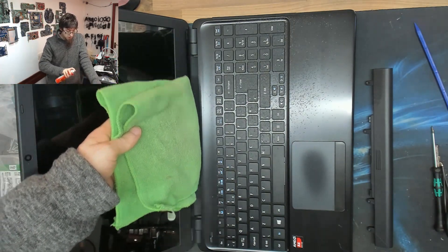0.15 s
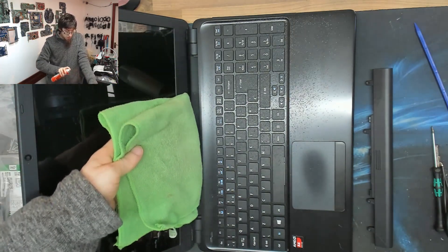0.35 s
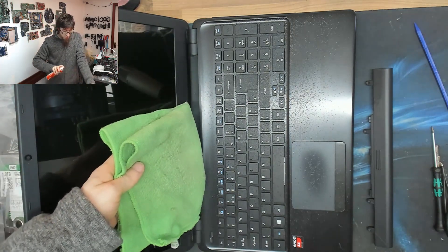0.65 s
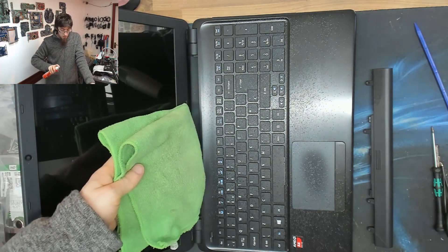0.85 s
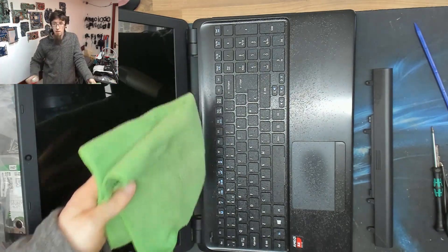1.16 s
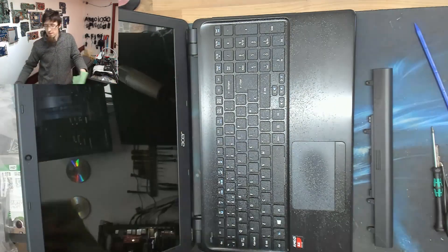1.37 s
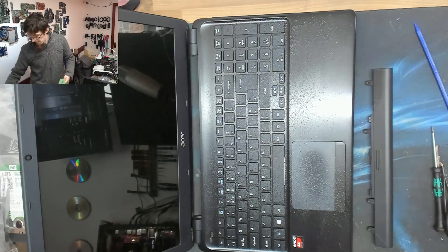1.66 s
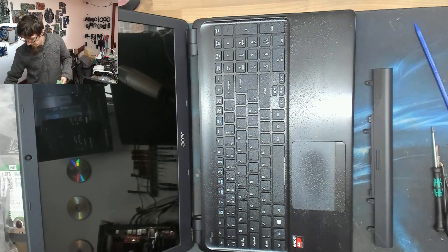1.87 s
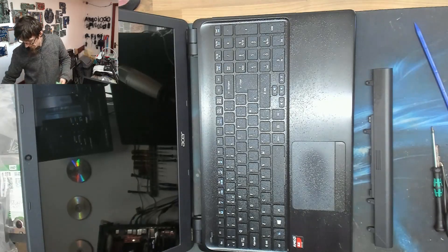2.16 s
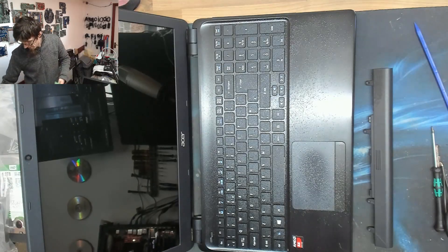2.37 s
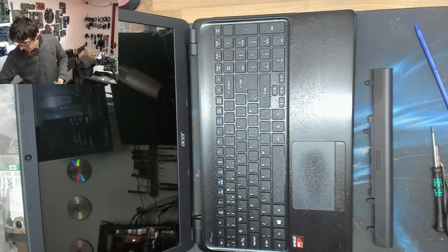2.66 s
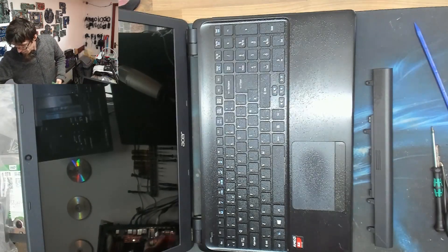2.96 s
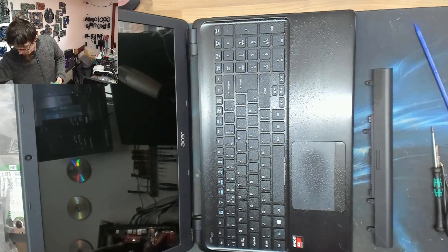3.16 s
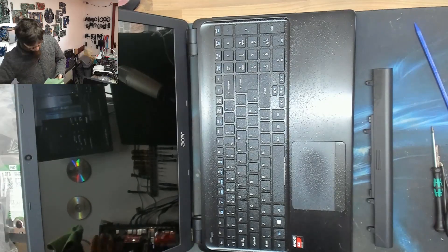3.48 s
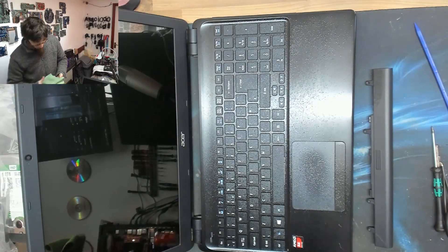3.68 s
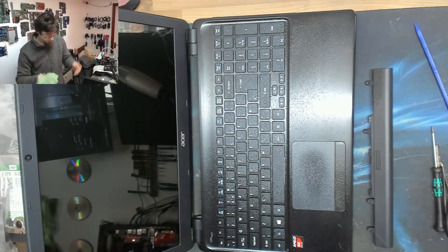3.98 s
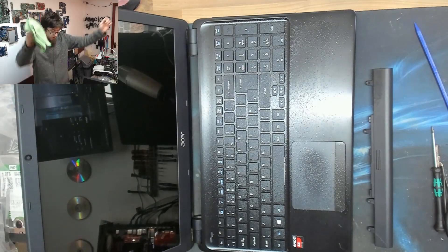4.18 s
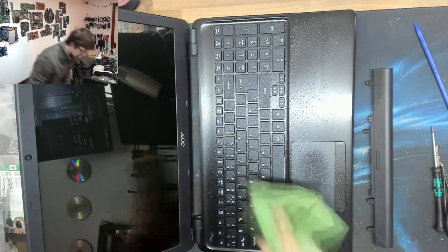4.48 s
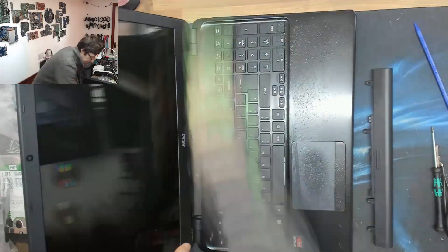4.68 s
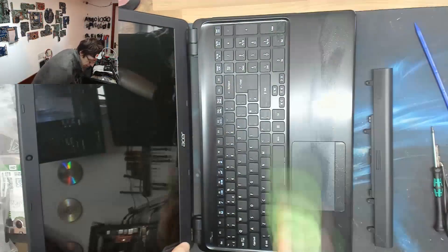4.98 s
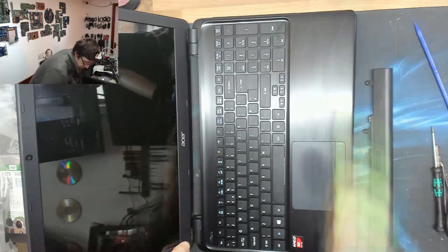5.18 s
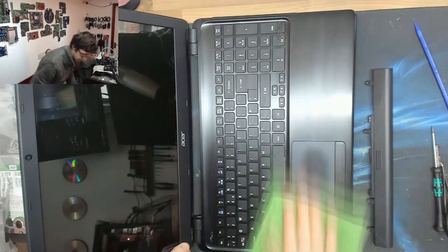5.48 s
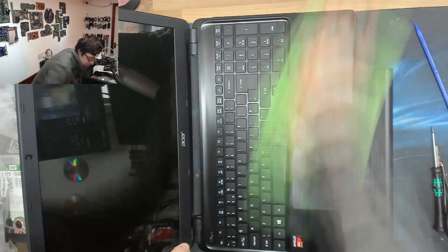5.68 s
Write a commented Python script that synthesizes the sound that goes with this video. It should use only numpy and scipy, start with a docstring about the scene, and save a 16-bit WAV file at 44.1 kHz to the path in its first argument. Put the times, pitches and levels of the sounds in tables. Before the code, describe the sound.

Close up in a small dry room, an aerosol hisses in about ten quick sputtering puffs. The can taps down with small metallic tinks, things slide on the desk and a plastic cap snaps sharply. After a quiet gap, a heavy object slams onto the desk, rattles and rocks to rest. A cloth swishes, then wipes plastic and keys with squeaks and low bumps.

```python
"""A small can hisses in short puffs: sputtering noise shaped by a nozzle. It is set down with tinks (short sines)
while things slide on the desk (rubbing noise), then capped with a snap (noise bands that die away).
Something heavy lands on the desk (noise, a low push and ringing tones), rattles, chinks and rocks to rest.
A cloth swishes, wipes a plastic case and its keys with squeaks and a low hum, then scrubs amid low bumps: grainy
noise and gliding tones. Low desk rumble and faint noise run throughout, in a small dry room."""
import sys
import numpy as np
from scipy import signal
from scipy.fft import rfft, irfft
from scipy.io import wavfile

SR = 44100
rng = np.random.default_rng(int(sys.argv[2]) if len(sys.argv) > 2 else 0)


def transcribe(u):
    """Save the signal u as a 16-bit wav file named by the first command-line argument.

    u: samples, shape (n,) or (channels, n), limited to [-1, 1]; the rate is SR.
    q: integer samples, one column per channel.
    """
    v = np.clip(np.atleast_2d(u).T, -1, 1)
    q = np.round(v * 32767).astype(np.int16)
    wavfile.write(sys.argv[1], SR, q)


N = 257544
TIME = np.arange(N) / SR

# blows on the desk: (time [s], level [dB])
THUDS = [(1.062, -65), (1.104, -53), (3.075, -2), (3.315, -47.5), (3.409, -49.5), (3.483, -20.5),
         (3.552, -46), (3.616, -20.5), (3.678, -33.5), (3.736, -28.5), (3.884, -41.5), (3.925, -32.5),
         (3.998, -32), (4.033, -34.5), (4.425, -40.5)]
# how strongly the desk sounds at each pitch: (frequency [Hz], relative level [dB])
DESK_COLOUR = [(60, -8), (135, -5), (302, -1), (1030, -14), (1800, -17.5), (3500, -30.5), (15000, -58.5)]
# something rolls and rocks to rest: (time [s], level [dB])
ROLLING = [(3.28, -63.5), (3.46, -54), (3.56, -43.5), (4.05, -47.5), (4.15, -56), (4.36, -120)]
# the cloth crosses rows of keys:
# (first catch [s], time between catches [s], rub above steady contact [dB], rustle above steady contact [dB])
KEY_RUNS = [(4.632, 0.0445, 12.1, 8), (5.152, 0.049, 3.6, -2)]
KEY_ROWS = 9, 3   # number of catches in each run


def from_db(db):
    """Turn decibels into a gain."""
    return 10 ** (np.asarray(db) / 20)


def rms_one(x):
    """Scale a sound so its average (rms) strength is 1."""
    return x / np.sqrt(np.mean(x ** 2) + 1e-20)


def at_hz(points, hz):
    """Read a table between its points, along a log frequency axis."""
    p = np.array(points)
    return np.interp(np.log(hz + 1e-9), np.log(p[:, 0]), p[:, 1])


def in_time(rows):
    """Draw each column of a table as a curve over time, one value a sample."""
    s, *columns = np.transpose(rows)
    return [np.interp(TIME, s, c) for c in columns]


def level_between(s, db):
    """Draw a level curve in dB that is practically silent before its first and after its last point."""
    return np.interp(TIME, s, db, left=-140, right=-140)


def drift(rate):
    """Wander slowly at random around 0 with rms 1; a higher rate (Hz) wanders faster."""
    r = np.exp(-2 * np.pi * rate / SR)
    wander = signal.lfilter([1], [1, -2 * r, r * r], rng.standard_normal(N + SR))
    return rms_one(wander[SR:])   # skip the filter's start-up


def coloured(spectrum, x):
    """Weight a sound's frequencies by a table, with nothing below the table's low end; rms 1."""
    hz = np.fft.rfftfreq(N, 1 / SR)
    inside = hz >= spectrum[0][0]
    return rms_one(irfft(rfft(x) * from_db(at_hz(spectrum, hz)) * inside, N))


def low_pass(x, hz):
    """Remove what lies above a frequency, with a fourth-order slope."""
    return signal.sosfilt(signal.butter(4, hz, fs=SR, output="sos"), x)


def grit(per_s, spread_db):
    """Make a bed of noise with dense random clicks of uneven size, like a rough surface."""
    sizes = from_db(spread_db * np.minimum(rng.exponential(1, N), 5))
    hits = rng.random(N) < per_s / SR
    return rng.standard_normal(N) * (1 + sizes * hits)


def clicks(rows, gain_db):
    """Put one click at each row's time."""
    train = np.full(N, 1e-18)   # not quite zero, to keep the filters quick
    np.add.at(train, np.round(np.array(rows)[:, 0] * SR).astype(int), from_db(gain_db))
    return train


def die_away(x, t60):
    """Turn each click into a level that falls by 60 dB in t60 seconds."""
    return signal.lfilter([1], [1, -from_db(-60 / (t60 * SR))], x)


def resonate(x, hz, t60):
    """Let each unit click set a dying sine of starting height 1 ringing."""
    r, w = from_db(-60 / (t60 * SR)), 2 * np.pi * hz / SR
    return signal.lfilter([0, np.sin(w)], [1, -2 * r * np.cos(w), r * r], x)


def ring(rows, modes, scatter_db, level_db, contact_s):
    """Strike each mode with its own random strength; a padded contact lets the ring build up."""
    out = np.zeros(N)
    luck = rng.normal(0, 1, (len(rows), len(modes)))
    for k, (hz, db, t60) in enumerate(modes):
        gain_db = np.array(rows)[:, 1] + db + level_db + scatter_db * luck[:, k]
        ringing = resonate(clicks(rows, gain_db), hz, t60)
        out += resonate(ringing, hz, contact_s) * 2 * np.log(1000) / (contact_s * SR)
    return low_pass(out, 1.5 * modes[-1][0])   # little above the top mode


def soft(rows, hz):
    """Loss in dB above a blow's contact edge: a soft contact lasts longer, so it sounds duller."""
    edge_hz = np.array(rows)[:, 2]
    return -10 * np.log10(1 + (hz / edge_hz) ** 12)


def clatter(rows, spectrum, decay, crack_db, level_db, contact_s):
    """Stand in for too many modes to count: noise bands, each a short crack and a tail with its own decay."""
    out = np.zeros(N)
    edges = np.geomspace(60, 16000, 21)
    white = rng.standard_normal((2, N))   # neighbouring bands use different noise
    for k, (low, high) in enumerate(zip(edges, edges[1:])):
        hz = np.sqrt(low * high)
        gain_db = np.array(rows)[:, 1] + level_db + at_hz(spectrum, hz) + soft(rows, hz)
        train = clicks(rows, gain_db)
        tail = die_away(train, at_hz(decay, hz))
        crack = from_db(crack_db) * die_away(train, 0.015)
        # the contact time rounds off the start
        step = 1 / (contact_s * SR)
        swell = signal.lfilter([step], [1, step - 1], tail + crack)
        band = signal.butter(4, [low, high], "band", fs=SR, output="sos")
        out += signal.sosfilt(band, white[k % 2] * swell)
    return out


def floor():
    """Faint steady noise, weaker toward the treble."""
    # background colour: (frequency [Hz], relative level [dB])
    floor_colour = [(150, -4), (1780, -18.5), (15800, -33)]
    return coloured(floor_colour, rng.standard_normal(N)) * from_db(-88)


def rumble():
    """The desk shakes a little at rest, more after blows, under the rolling and under the leaning hand."""
    # resting shake of the desk: (time [s], level [dB])
    rest_shake = [(0, -67), (1.05, -64), (2.6, -63), (2.75, -95), (3.06, -57.5)]
    # colour of the shake: (frequency [Hz], relative level [dB])
    shake_colour = [(12, 8), (43, -2), (81, 2.5), (172, -19.5), (500, -81)]
    after_db, after_t60_s = -42.5, 0.69   # each blow's after-shake, relative to the blow; its decay
    roll_share, roll_db = 0.44, -18   # share of the rolling's dB that the shake follows, and its offset
    lean_s, lean_rise_s, lean_db = 4.485, 0.17, -41   # the wiping hand leans on the desk

    after = die_away(clicks(THUDS, np.array(THUDS)[:, 1] + after_db), after_t60_s)
    rolling = from_db(roll_share * level_between(*np.transpose(ROLLING)) + roll_db)
    lean = from_db(lean_db) * np.clip((TIME - lean_s) / lean_rise_s, 0, 1) ** 2
    rest = from_db(in_time(rest_shake)[0])
    level = np.sqrt(rest ** 2 + after ** 2 + rolling ** 2 + lean ** 2)
    return coloured(shake_colour, rng.standard_normal(N)) * level * from_db(3.5 * drift(35))


def moan():
    """A soft low hum slides up under the wipe, broken and unsteady in level."""
    # path of the hum: (time [s], pitch [Hz], level [dB])
    glide = [(5.04, 125.5, -44.5), (5.24, 205, -55), (5.3, 220, -59)]
    s, hz, db = np.transpose(glide)
    phase = 2 * np.pi * np.cumsum(np.interp(TIME, s, hz)) / SR
    return np.sin(phase) * from_db(level_between(s, db) + 6 * drift(22))


def chinks():
    """A small loose part chinks as the heavy thing rocks, and once more shortly after: short scuffed rings."""
    # chinks of the loose part: (time [s], level [dB], pitch [Hz])
    loose_part = [(3.49, -71, 4140), (3.517, -70, 3600), (3.628, -68, 3630), (3.736, -68, 3220),
                  (3.738, -78, 4040), (3.968, -82, 3060), (3.995, -77.5, 3620), (4.012, -71, 4330),
                  (4.036, -77, 5030), (4.492, -74.5, 3710)]
    out, scuff = np.zeros(N), 1 + drift(70)
    for s, db, hz in loose_part:
        age = np.maximum(TIME - s, 0)
        fade = from_db(db - 60 * age / 0.13)
        out += fade * np.sin(2 * np.pi * hz * age) * np.minimum(age / 0.0094, 1)   # soft start
    return out * scuff


def rattles():
    """The keys rattle under a hard scrub: bright noise bursts that die quickly."""
    # bursts: (time [s], level [dB])
    bursts = [(5.449, -71), (5.71, -40), (5.796, -38)]
    # colour of the rattling keys: (frequency [Hz], relative level [dB])
    key_colour = [(4500, -5), (7000, 9.5), (10500, -5)]
    fade = die_away(clicks(bursts, np.array(bursts)[:, 1]), 0.1)
    return coloured(key_colour, rng.standard_normal(N)) * fade


def can():
    """Each tap rings the can wall with one clear short tone and wakes clusters of small rings."""
    # taps on the can: (time [s], clear ring [dB], small rings [dB],
    #                   centre of the small rings it wakes [Hz], spread of those it wakes [log frequency])
    taps = [(1.086, -56.5, -66.5, 6000, 0.36), (1.106, -45, -65.5, 8000, 1), (1.204, -48, -72, 9000, 1),
            (1.387, -68, -84, 5800, 0.24), (3.303, -56, -64.5, 11300, 0.28),
            (3.491, -81, -63.5, 9040, 0.098)]
    # centres of the small-ring clusters: (frequency [Hz])
    cluster_hz = [4110, 4650, 5720, 6340, 7730, 8600, 9400, 10500, 12100, 13500, 14400]
    wall_hz, wall_t60_s, small_t60_s = 2614, 0.06, 0.14

    out = np.zeros(N)
    waver = 1 + .9 * drift(130)   # random wavering roughens the clear ring
    hz = np.repeat(cluster_hz, 7)[:, None]   # seven close rings in each cluster
    hz = hz * (1 + .05 * rng.standard_normal(hz.shape))
    all_draws = rng.normal(0, 1, (len(taps), len(hz), 2))
    for (s, db, small_db, centre_hz, width), draws in zip(taps, all_draws):
        part = slice(int(s * SR), int((s + .3) * SR))
        age = TIME[part] - TIME[part][0]
        late = np.maximum(age - 0.002 * np.abs(draws[:, 1:]), 0)   # the touch rattles for a few ms
        woken = np.exp(-.5 * (np.log(hz / centre_hz) / width) ** 2)
        fade = from_db(2.9 * draws[:, :1] - 9.5 - 60 * late / small_t60_s)
        small = (woken * fade * np.sin(2 * np.pi * hz * late)).sum(0)
        wall = np.sin(2 * np.pi * wall_hz * age) * from_db(-60 * age / wall_t60_s)
        wall *= np.minimum(age / 0.007, 1) * waver[part]
        out[part] += (from_db(db) * wall + from_db(small_db) * small) * np.minimum(age / 0.0028, 1)
    return out


def drag():
    """Things slide on the desk: friction noise sounds in the hollow parts it shakes."""
    # sliding: (time [s], level [dB])
    slide = [(1.0, -58.5), (1.63, -84), (1.69, -49), (1.9, -47), (2.45, -60.5), (2.62, -77.5)]
    # hollow parts: (frequency [Hz], width [Hz], relative level [dB])
    hollows = [(378, 160, 0.5), (581, 470, -7), (910, 190, -11.5), (1371, 210, 5)]
    out, rub = np.zeros(N), grit(260, spread_db=-1.5)
    for hz, width, top_db in hollows:
        r = np.exp(-np.pi * width / SR)
        poles = [1, -2 * r * np.cos(2 * np.pi * hz / SR), r * r]
        once = signal.lfilter([1, 0, -1], poles, rub)
        band = signal.lfilter([1, 0, -1], poles, once)   # twice, for a steeper resonance
        out += rms_one(band) * from_db(top_db - 13.5 + 3.5 * drift(22))
    level = from_db(in_time(slide)[0] + 4.1 * drift(17))
    return low_pass(out, 850) * level * (TIME < slide[-1][0])


def roll():
    """Something rolls and rocks: a dense rattle of small knocks, dull noise in the desk's colour."""
    small_knocks = grit(60, spread_db=5.0) * from_db(2.2 * drift(18))
    level = from_db(level_between(*np.transpose(ROLLING)))
    return low_pass(coloured(DESK_COLOUR, small_knocks), 710) * level


def nozzle():
    """Each puff opens fast, holds and dies as pressure drops; the jet of air hisses and sputters."""
    # puffs: (time [s], level [dB], time held [s])
    puffs = [(0.0, -18.5, 0.051), (0.183, -22.5, 0.048), (0.216, -20, 0.068), (0.2504, -28, 0.032),
             (0.3772, -21.5, 0.036), (0.44, -22.5, 0.044), (0.561, -23, 0.033), (0.6336, -22.5, 0.031),
             (0.741, -24, 0.042), (0.826, -23, 0.033)]
    # colour of the hiss: (frequency [Hz], relative level [dB])
    jet_colour = [(400, -23), (900, -16.5), (1820, 1.5), (2700, -4), (5720, 2), (15600, -1)]
    echo_s, echo_share = .000765, .42

    power = np.zeros(N)
    for s, db, held in puffs:
        age = TIME - s
        fall_db = 60 * np.clip(age - held, 0, 1) / .1
        power += from_db(2 * (db - 14 - fall_db)) * np.clip(age / .009, 0, 1) ** 2
    hiss = coloured(jet_colour, grit(900, spread_db=3.2))
    jet = hiss * np.sqrt(power) * from_db(2.5 * drift(120))
    # an inverted close echo strengthens some pitches and weakens others
    return jet - echo_share * np.interp(TIME - echo_s, TIME, jet)


def squeaks():
    """The damp cloth sticks and slips on each key row of the first run: short climbing tones, new every row."""
    lowest_hz, highest_hz = 580, 950   # range of starting pitches
    rise = .25   # share the pitch climbs over one row
    (first, step, *_), last = KEY_RUNS[0], KEY_ROWS[0]
    rows = (TIME - first) / step + .5   # whole part: which row; remainder: how far across it
    row = np.clip(rows, 0, last).astype(int)
    start_hz = rng.uniform(lowest_hz, highest_hz, (last + 1, 3))[row].T   # three tones a row
    phase = 2 * np.pi * np.cumsum(start_hz * (1 + rise * (rows % 1)), axis=1) / SR
    swell = np.abs(np.sin(np.pi * rows)) * (rows > 0) * (rows < last)
    return np.sin(phase).sum(0) * swell * from_db(-2)


def contact():
    """Gains of rub and rustle: an air swish, then steady contact that swells on each key row, and scrubs."""
    # steady contact: (time [s], rub on the case [dB], fibre rustle [dB])
    touch = [(4.44, -80, -75.5), (4.558, -75.5, -99), (4.597, -55, -54), (5.0, -55.5, -53),
             (5.03, -66, -59), (5.055, -52, -48.5), (5.11, -62.5, -51), (5.27, -62, -64), (5.4, -68, -75),
             (5.53, -61.5, -62.5), (5.6, -83, -71), (5.84, -48, -52)]
    # short scrubs: (time of peak [s], rub [dB], rustle [dB], rise [s])
    scrubs = [(5.575, -47, -50.5, 0.017), (5.651, -50.5, -52, 0.017), (5.716, -43, -52.5, 0.0024),
              (5.789, -41.5, -47, 0.0026), (5.83, -53, -53, 0.0081)]
    swish_start_s, swish_stop_s, growth_db_per_s = 4.13, 4.315, 75
    swish_db = [[-61.5], [-59]]   # rub and rustle at the stop
    catch_s, catch_scatter_db, scrub_fall_s = 0.011, 2, 0.015

    swish = from_db(growth_db_per_s * np.minimum(TIME - swish_stop_s, 0))
    swish *= np.clip((TIME - swish_start_s) / 0.075, 0, 1) ** 2
    swish *= np.clip(1 + (swish_stop_s - TIME) / 0.017, 0, 1)
    steady = from_db(in_time(touch)) * (TIME > touch[0][0])
    out = steady + from_db(swish_db) * swish
    for (first, step, *lift_db), count in zip(KEY_RUNS, KEY_ROWS):
        for k, luck in enumerate(rng.normal(0, 1, (count, 2))):
            swell = np.exp(-.5 * ((TIME - first - k * step) / catch_s) ** 2)
            lift = from_db(np.array(lift_db) + catch_scatter_db * luck)
            out += steady * lift[:, None] * swell
    for s, rub_db, rustle_db, rise in scrubs:
        width = np.where(TIME < s, rise, scrub_fall_s)
        swell = np.exp(-.5 * ((TIME - s) / width) ** 2)
        out += from_db([[rub_db], [rustle_db]]) * swell
    return out


def cloth():
    """Cloth rubs and squeaks on plastic while its fibres rustle; a light touch rustles duller than a firm one."""
    # colour of the rub on the case: (frequency [Hz], relative level [dB])
    rub_colour = [(300, -5), (560, 3.5), (850, 0.5), (1250, -2.5), (2500, -21), (4500, -72.5)]
    # colour of the fibres: (frequency [Hz], relative level [dB])
    fibre_colour = [(710, -29), (1200, -6), (4570, -9.5), (8180, -15), (15800, -30.5)]
    rub, rustle = contact()
    fibres = coloured(fibre_colour, grit(1800, spread_db=4.5))
    dull = low_pass(fibres, 3900)
    half = low_pass(low_pass(fibres, 9300), 9300)
    # stronger contact opens the middle treble, then the top
    light = np.minimum(rustle / from_db(-55), 1) ** 1.2
    firm = np.minimum(rustle / from_db(-50), 1) ** 2.5
    rustling = dull + light * (half - dull) + firm * (fibres - half)
    scrub = coloured(rub_colour, grit(330, spread_db=4.0)) + squeaks()
    flutter = from_db(1.8 * drift(70))
    return flutter * (scrub * rub + rustling * rustle)


def bumps():
    """Low bumps ring two desk modes: one just after the heavy landing, the rest under the wiping hand."""
    # bumps: (time [s], level [dB])
    desk_bumps = [(3.145, -22), (5.065, -33), (5.155, -26.5), (5.25, -33), (5.495, -24.5), (5.66, -24.5),
                  (5.785, -17)]
    # low modes of the desk: (frequency [Hz], relative level [dB], time to fall 60 dB [s])
    low_modes = [(49.7, -1, 0.055), (80.5, -1, 0.099)]
    return ring(desk_bumps, low_modes, scatter_db=2.0, level_db=-1.5, contact_s=0.054)


def cap():
    """Plastic snaps and taps: noise bands with a brief crack and a dying tail."""
    # snaps and taps: (time [s], level [dB], contact edge [Hz])
    snaps = [(0.118, -41, 3374), (1.275, -51, 1870), (1.908, -11, 15000), (2.054, -29, 8600),
             (2.082, -52, 12280), (4.41, -47, 2570), (4.56, -48.5, 14180)]
    # colour of the plastic: (frequency [Hz], relative level [dB])
    cap_colour = [(120, -17.5), (208, -8.5), (578, -19.5), (1260, -3), (2570, -10.5), (8740, -25.5),
                  (15800, -40)]
    # how long it sounds: (frequency [Hz], time to fall 60 dB [s])
    cap_decay = [(150, 0.084), (1500, 0.24), (14000, 0.21)]
    return clatter(snaps, cap_colour, cap_decay, crack_db=4.0, level_db=4, contact_s=0.0012)


def knocks():
    """Each blow bottoms out just after first touch: one short dull push."""
    late_s, push_db, follows = .006, 22, .82   # delay, level offset, share of the blow's dB
    rows = np.array(THUDS) + [late_s, 0]
    push = clicks(rows, push_db + follows * rows[:, 1])
    return -low_pass(low_pass(push, 950), 950)


def blows():
    """Blows on the desk: clattering noise, ringing modes and a push; softer blows are duller."""
    # how long the desk sounds: (frequency [Hz], time to fall 60 dB [s])
    desk_decay = [(60, 0.39), (300, 0.31), (4000, 0.27), (12000, 0.16)]
    # clear modes of the desk: (frequency [Hz], relative level [dB], time to fall 60 dB [s])
    desk_modes = [(66, -13, 0.61), (226.6, 1.5, 0.073), (496, 2.5, 0.056), (863, -9, 0.028),
                  (1048, -6.5, 0.098), (1294, -10.5, 0.06)]
    softest_hz, hardest_hz, edge_follows = 1080, 15820, 0.9   # edge floor, 0 dB part, share of the blow's dB
    struck = []
    for s, db in THUDS:
        edge_hz = np.hypot(softest_hz, hardest_hz * from_db(edge_follows * db))
        struck.append((s, db, edge_hz))
    noise = clatter(struck, DESK_COLOUR, desk_decay, crack_db=11.0, level_db=1.0, contact_s=0.0052)
    tones = ring(THUDS, desk_modes, scatter_db=4.0, level_db=-10.5, contact_s=0.0043)
    return noise + tones + knocks()


def room(x):
    """A small room's diffuse tail: fading noise whose treble dies sooner."""
    low_t60_s, high_t60_s = 0.25, 0.16
    t = np.arange(SR // 2) / SR
    noise = rng.standard_normal(len(t))
    low = signal.lfilter([.3], [1, -.7], noise)
    tail = low * from_db(-60 * t / low_t60_s) + (noise - low) * from_db(-60 * t / high_t60_s)
    tail *= t > .004   # a short gap before the tail
    return signal.fftconvolve(x, tail / np.sqrt(np.sum(tail ** 2)))[:N] * from_db(-6)


def scene():
    """Add all sources; only the hiss, the cloth and the small rings and rattles get the room's tail."""
    jet, wipe = nozzle(), cloth()
    tinks = can() + chinks() + rattles()
    airborne = jet + wipe + tinks + room(jet + 0.56 * wipe + 0.8 * tinks)
    desk = blows() + bumps() + drag() + roll() + rumble()
    return (airborne + cap() + desk + moan() + floor())[None]


def record(dry):
    """Cut the top treble steeply at 15.7 kHz."""
    return signal.sosfilt(signal.ellip(12, .5, 70, 15700, fs=SR, output="sos"), dry)


dry = scene()
out = record(dry)
transcribe(out)
```